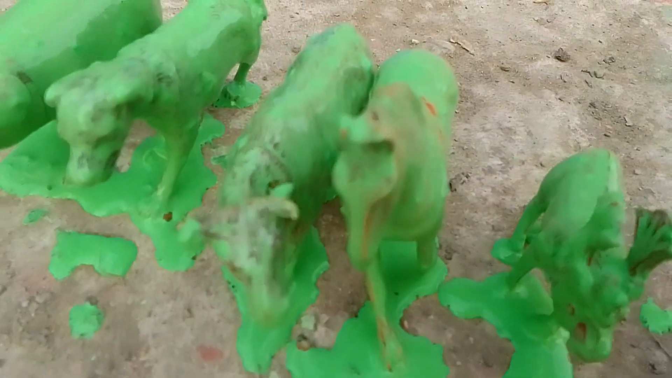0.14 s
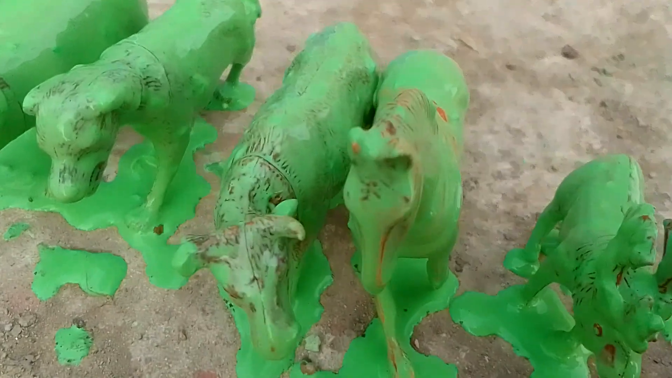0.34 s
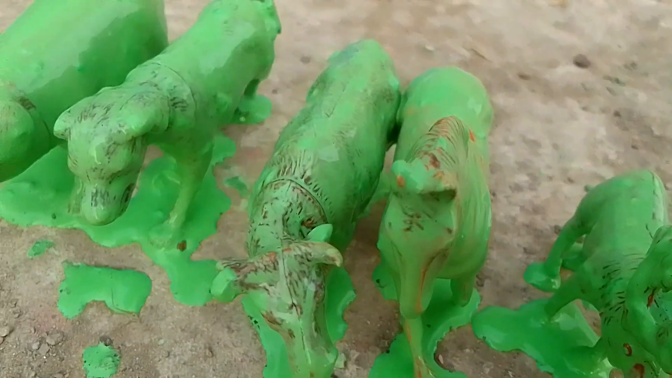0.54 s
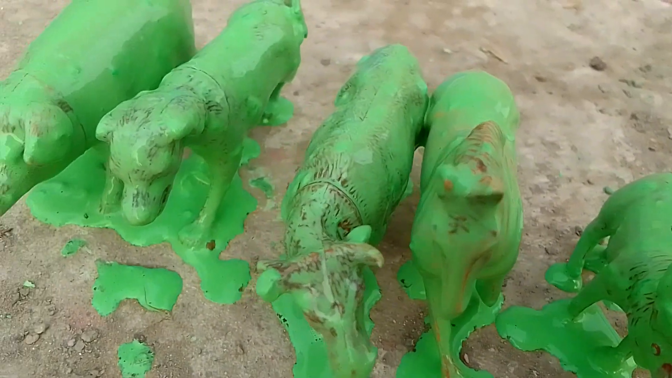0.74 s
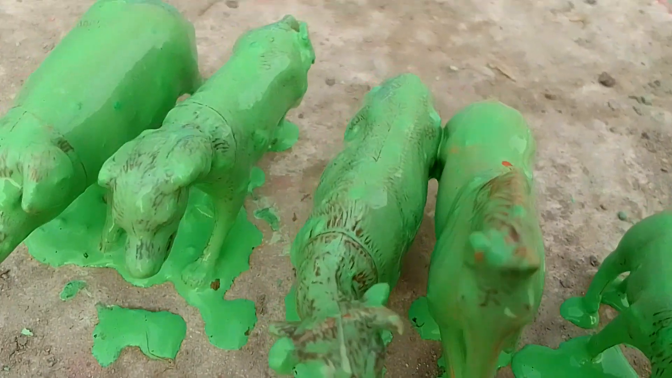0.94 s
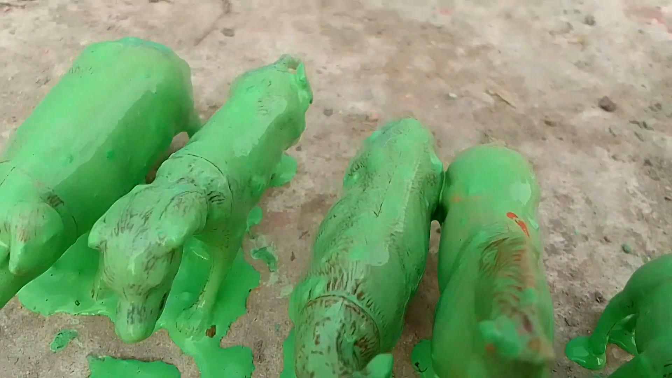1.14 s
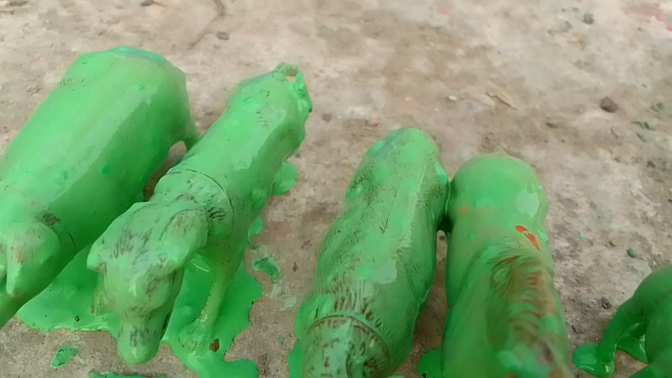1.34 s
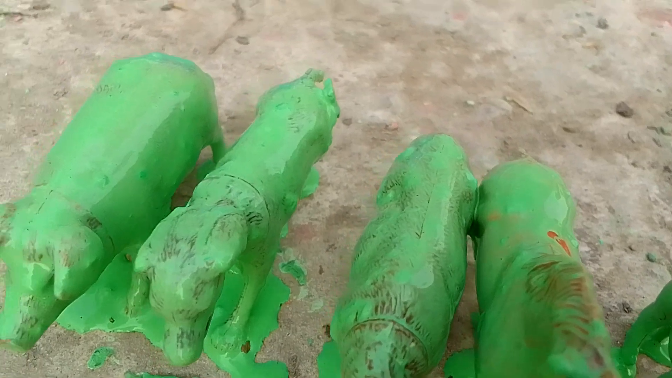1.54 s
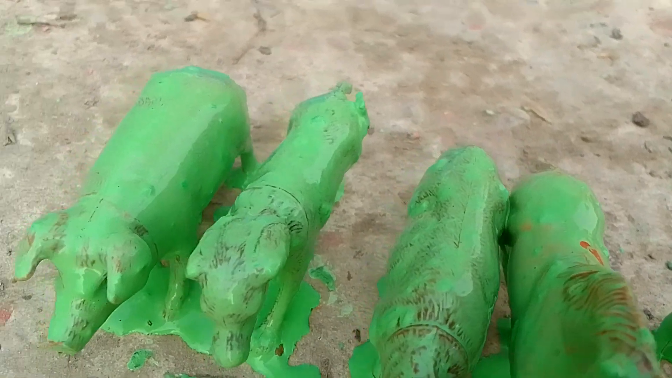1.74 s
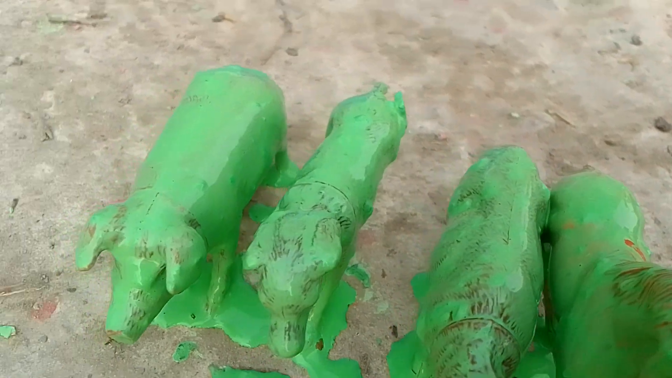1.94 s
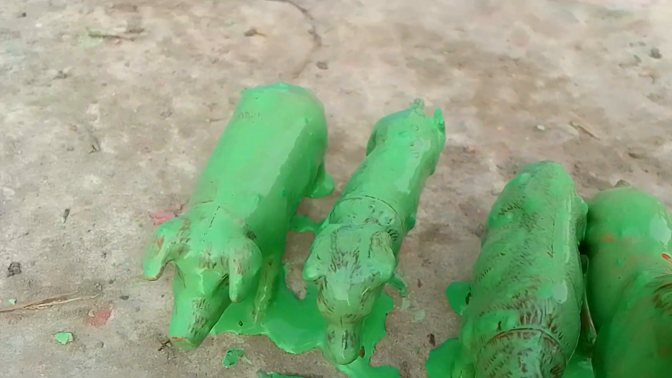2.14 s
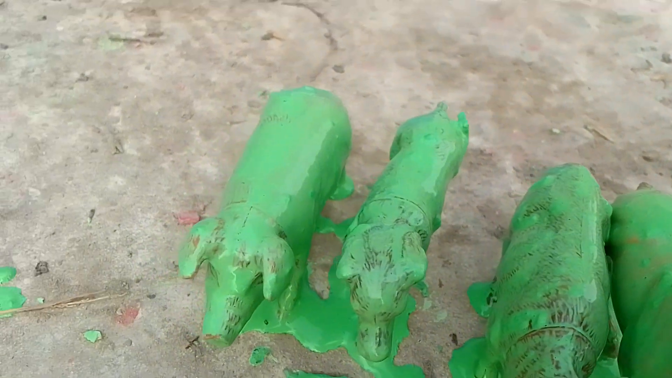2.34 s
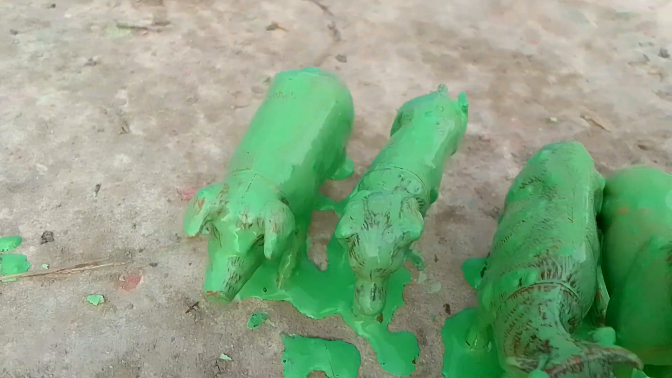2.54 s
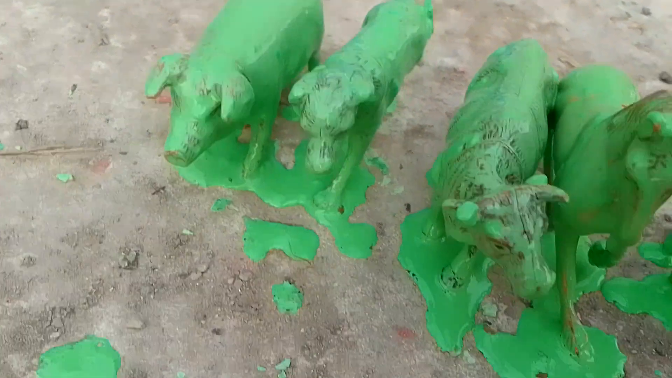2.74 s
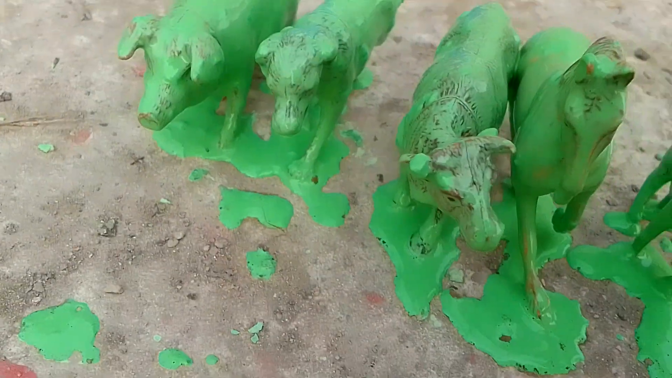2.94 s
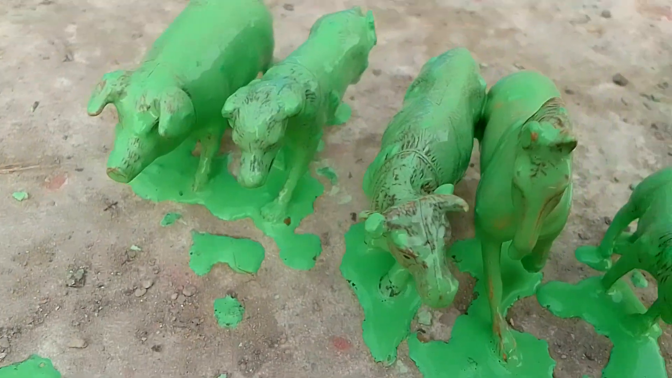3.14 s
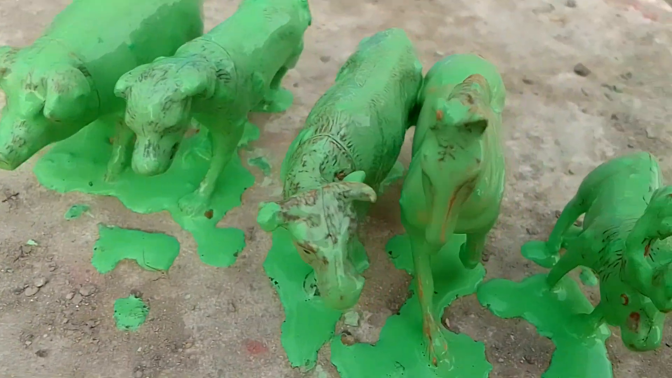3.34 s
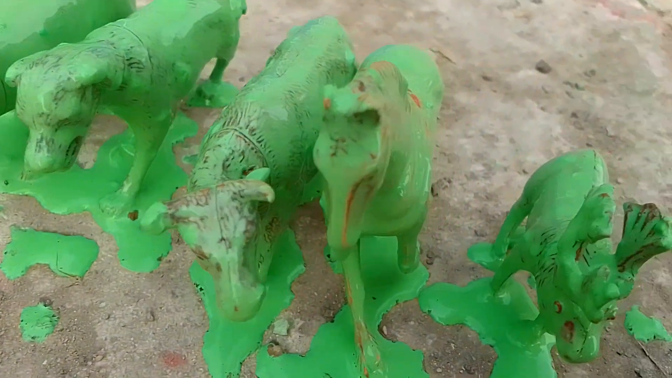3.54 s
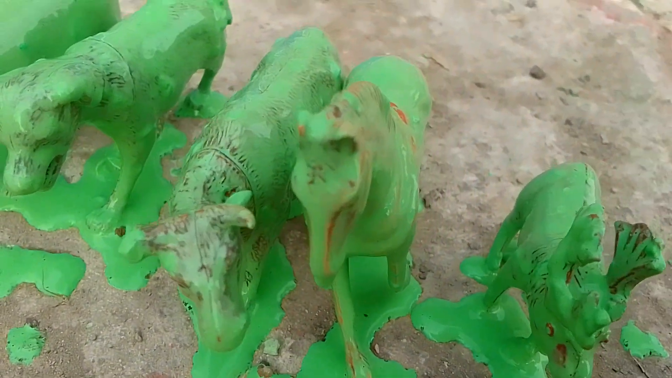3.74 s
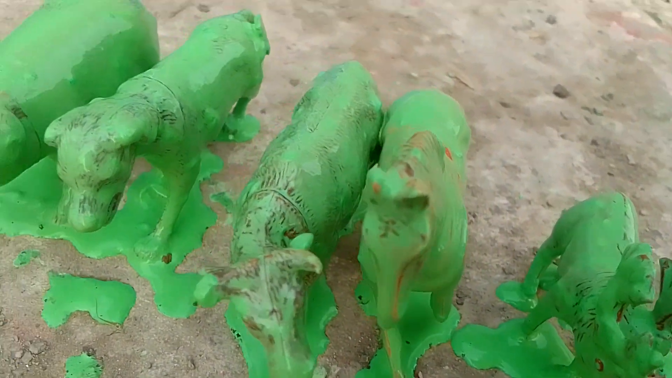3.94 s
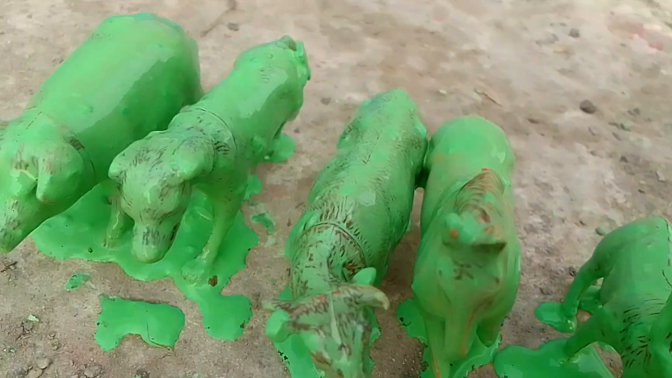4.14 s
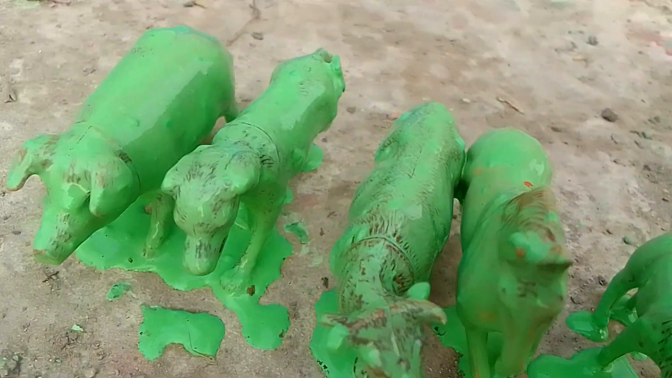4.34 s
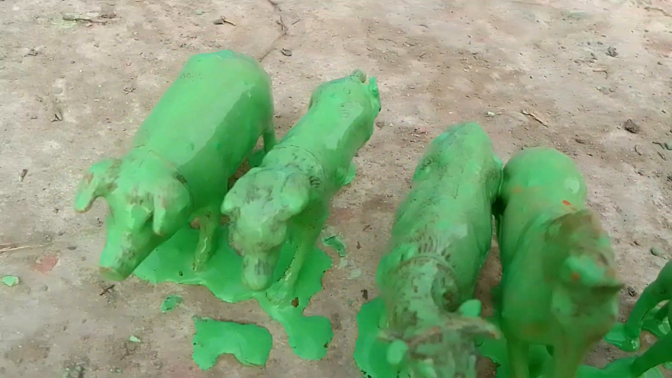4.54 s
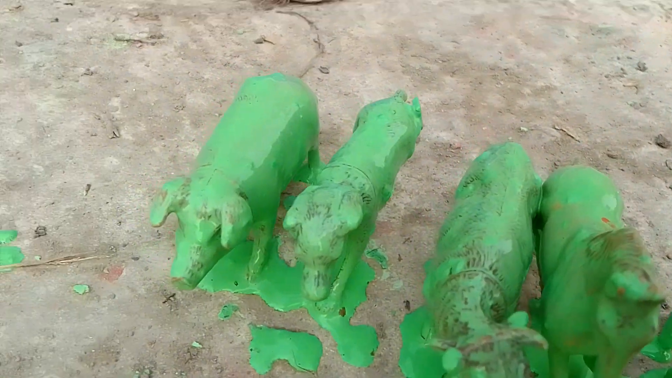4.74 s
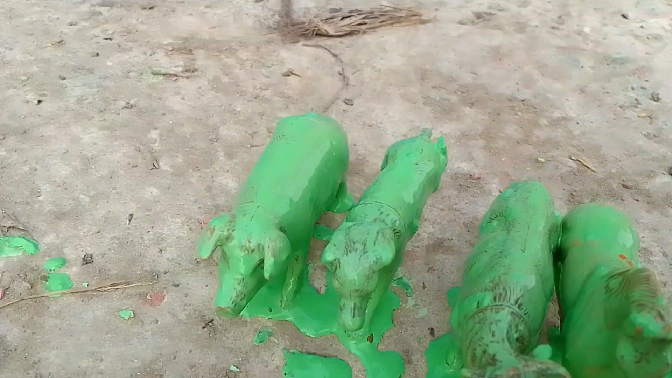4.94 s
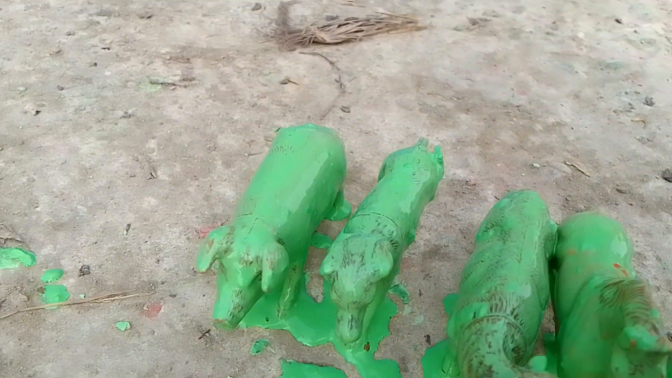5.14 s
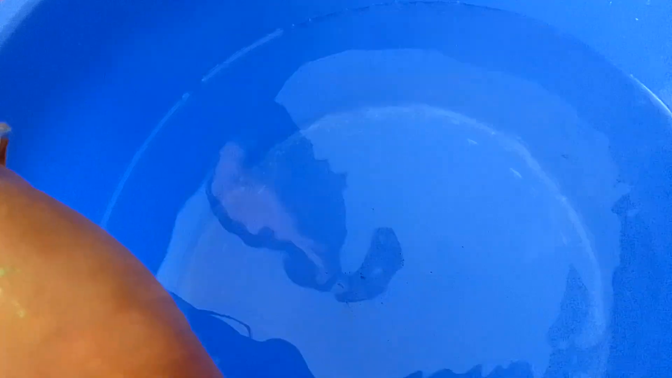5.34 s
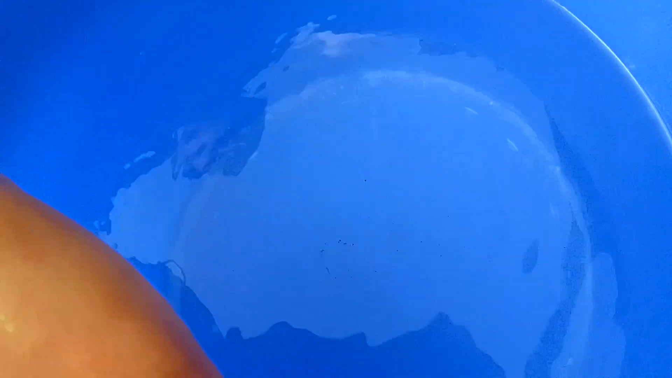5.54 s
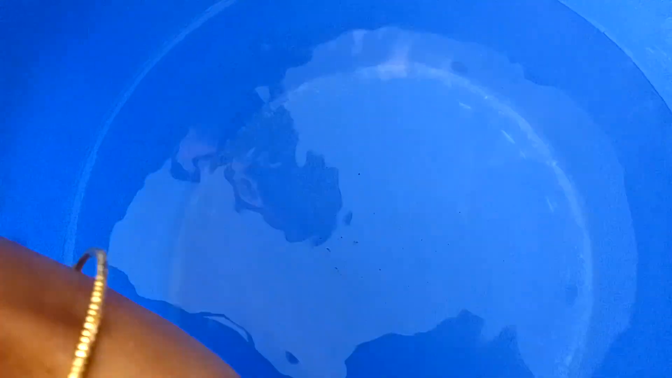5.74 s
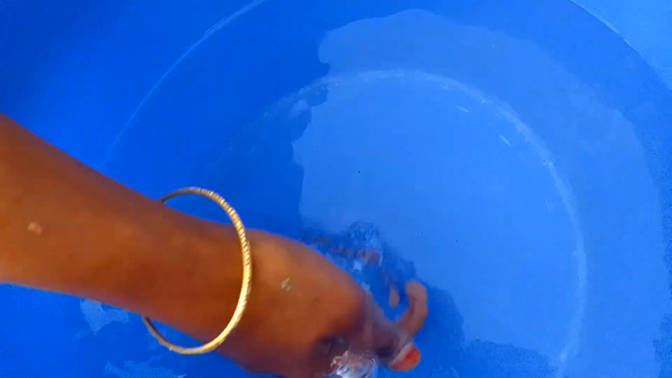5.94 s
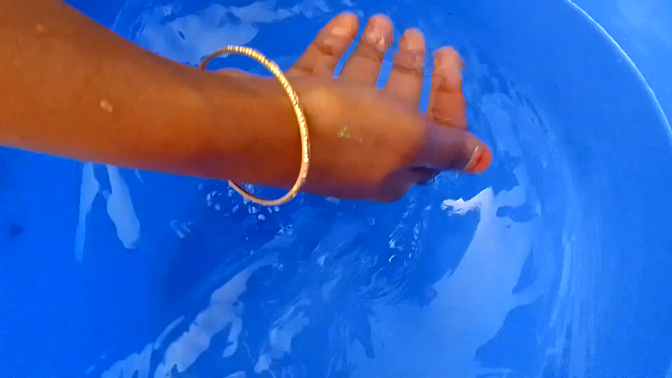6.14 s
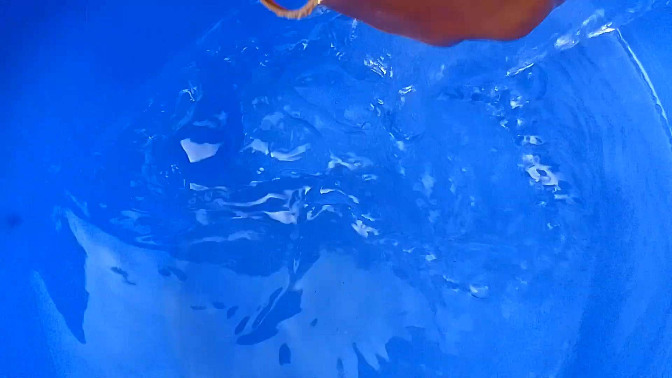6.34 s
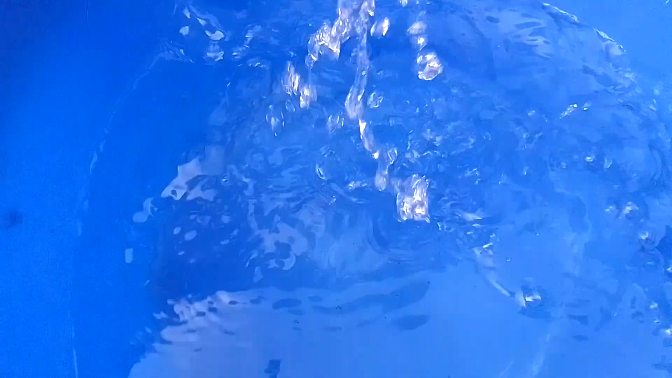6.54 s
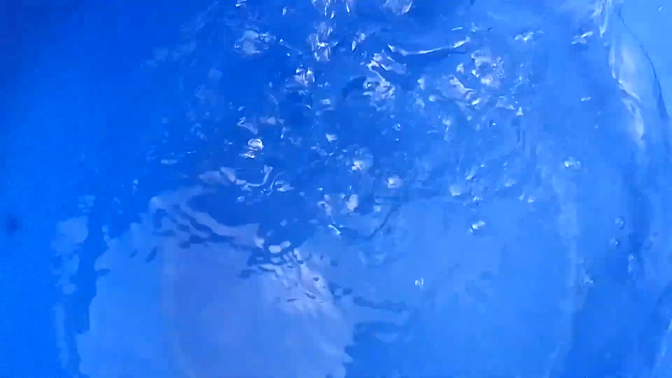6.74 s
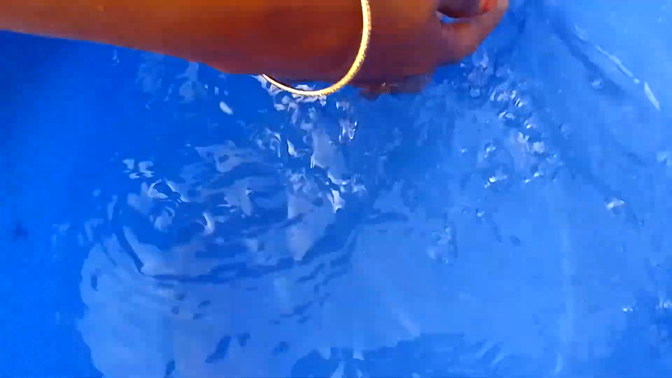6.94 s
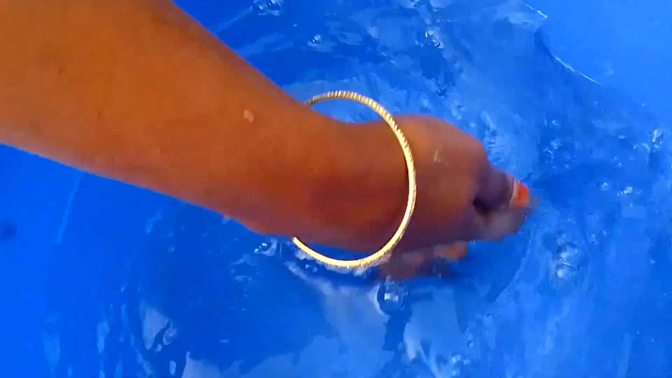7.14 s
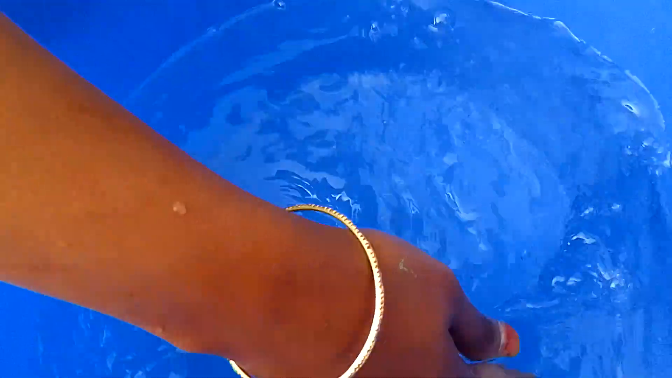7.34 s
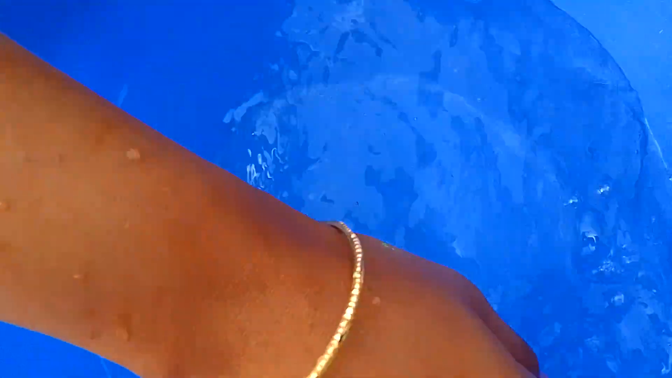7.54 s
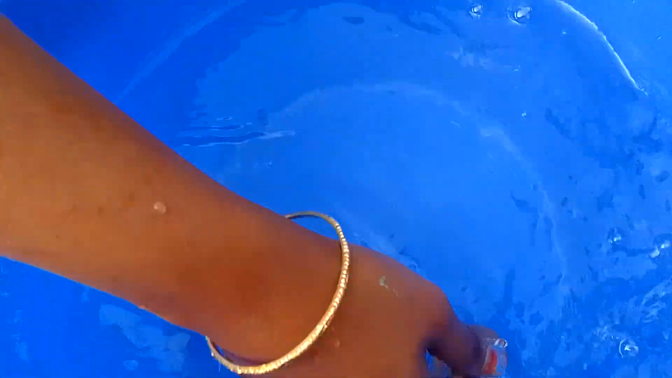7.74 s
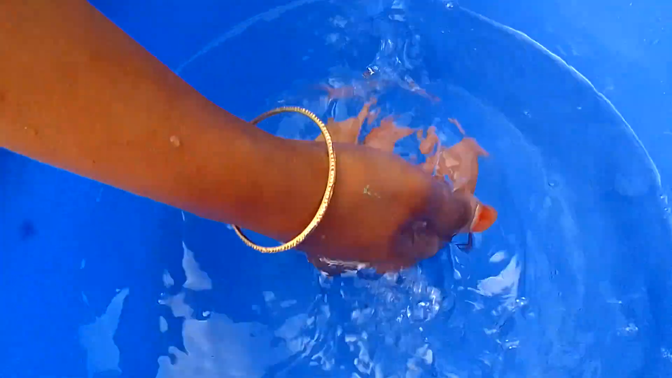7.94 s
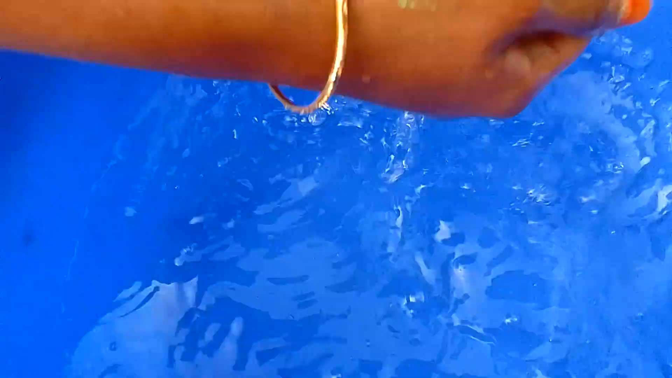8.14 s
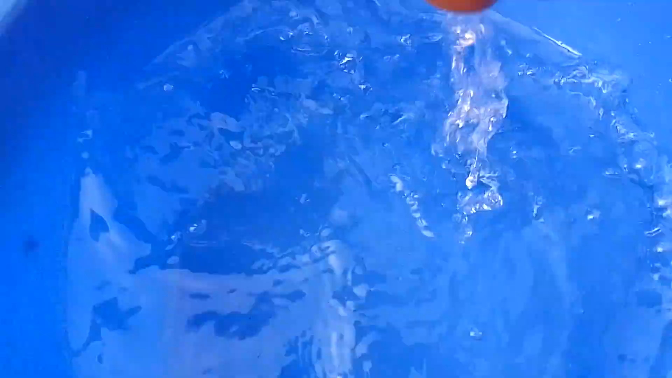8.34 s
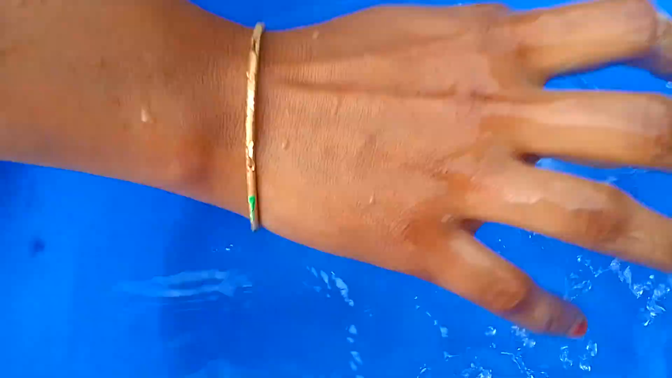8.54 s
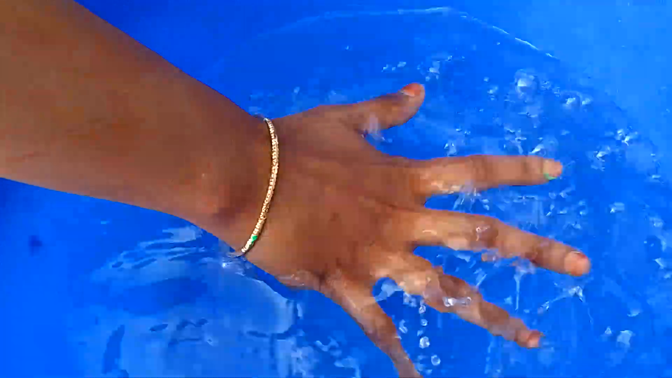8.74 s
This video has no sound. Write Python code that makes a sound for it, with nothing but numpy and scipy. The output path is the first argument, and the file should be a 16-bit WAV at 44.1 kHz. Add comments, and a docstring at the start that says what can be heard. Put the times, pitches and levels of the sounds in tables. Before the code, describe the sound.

Quiet yard with chirping birds, low wind, a few knocks, a ringing scrape and a gust; silence; then a hand splashes water in a plastic tub.

```python
"""First a yard: small birds whistle over low wind; hard knocks, a ringing scrape and a hollow bump nearby.
A gust of filtered noise moans with a thin hiss; then a silent pause.
Then a hand scoops through water in a plastic tub: gliding decaying sines ring as bubbles, noise bursts
tick and spray, and the palm slaps the surface and plunges. A faint low hum lies under the water;
birds and very low, mostly subsonic noise belong to both parts."""
import sys
import numpy as np
from scipy import signal
from scipy.fft import rfft, irfft
from scipy.io import wavfile
from scipy.ndimage import uniform_filter1d

SR = 44100
rng = np.random.default_rng(int(sys.argv[2]) if len(sys.argv) > 2 else 0)


def dump(signal):
    """Clip the signal to [-1, 1] and save it as 16-bit WAV at the path in sys.argv[1]."""
    limited = np.clip(np.atleast_2d(signal).T, -1, 1)
    pcm = np.round(limited * 32767).astype(np.int16)
    wavfile.write(sys.argv[1], SR, pcm)


N = 387198
TIME = np.arange(N) / SR
YARD_END_S, TUB_START_S = 5.086, 5.886
CUTOFF_HZ = 16300

# rel_db columns are relative: gains or normalisation follow. Spectra: rel_db per Hz.
# larger air bubbles, a few cycles if they burst at the surface:
# [start_s, pitch_hz, level_db, glide_limit_share, t60_cycles]
BUBBLES = [(5.93, 1580, -36, -0.24, 55), (6.076, 4260, -26, -0.081, 40), (6.106, 1310, -26, 0.091, 55),
           (6.1286, 1620, -24.5, 0.31, 48), (6.148, 2180, -30, 0.14, 63), (6.156, 5670, -18, .15, 39),
           (6.1847, 1820, -20.5, 0.012, 47), (6.189, 5170, -25.5, 0.16, 48), (6.23, 5600, -26.5, 0.49, 48),
           (6.2583, 1290, -22.5, -0.21, 66), (6.278, 6250, -20, -0.12, 39),
           (6.2824, 2370, -29.5, 0.091, 59), (6.2953, 830, -22.5, 0.033, 17), (6.3046, 1044, -27, 0.53, 43),
           (6.323, 1550, -4, -0.25, 2.5), (6.3615, 6100, -15.5, -0.14, 48), (6.3848, 4750, -26, 0.58, 40),
           (6.3854, 882, -30.5, -0.2, 49), (6.387, 1520, -21.5, -0.035, 18),
           (6.4353, 4300, -19.5, 0.31, 53), (6.437, 1288, -23.5, 0.39, 62), (6.444, 1423, -27, 0.36, 64),
           (6.4599, 770, -28, 0.25, 48), (6.47, 3370, -27.5, 0.55, 48), (6.489, 7130, -14.5, -0.26, 33),
           (6.504, 4340, -14, -0.13, 31), (6.505, 5570, -13, 0.17, 39), (6.5277, 3050, -28, 0.44, 42),
           (6.595, 3240, -29.5, 0.13, 43), (6.6872, 1290, -32, -0.093, 73), (6.7237, 929, -27, -0.17, 36),
           (6.73, 1790, -10.5, -0.11, 5), (6.7545, 4280, -4.5, -0.046, 8), (6.754, 1040, -10.5, -0.12, 6.5),
           (6.759, 1880, -9, -.14, 4.5), (7.3247, 1614, -35.5, -0.034, 53), (7.357, 1514, -28, 0.42, 28),
           (7.3884, 1700, -24.5, -0.15, 36), (7.649, 1730, -22.5, 0.13, 58), (7.659, 6650, -22.5, .51, 48),
           (7.679, 3170, -28, 0.044, 44), (7.768, 1150, -34.5, 0.18, 40), (7.755, 3180, -31, -0.12, 42),
           (7.7819, 990, -24, -0.12, 43), (7.784, 1620, -23, 0.28, 41), (7.812, 866, -27, -0.0023, 37),
           (7.812, 1490, -16, -0.25, 14), (7.812, 2360, -20.5, -0.032, 23), (7.833, 2000, -15, -0.06, 12),
           (7.8381, 2620, -0.5, -0.24, 4.5), (7.8868, 820, -33, -0.009, 72),
           (7.9533, 1226, -18.5, -0.007, 33), (7.982, 1870, -31.5, 0.25, 40),
           (8.02, 1288, -31.5, -0.054, 47), (8.0476, 1420, -24.5, -0.23, 33),
           (8.082, 1280, -33.5, -0.06, 59), (8.124, 3600, -22, -0.003, 15), (8.1726, 847, -37, -0.17, 55),
           (8.2249, 755, -39, -.1, 43), (8.2513, 588, -41.5, 0.25, 44), (8.253, 4040, -12, -0.094, 9),
           (8.2953, 693, -37, 0.12, 23), (8.389, 3300, -30, 0.038, 45), (8.466, 3480, -30, 0.22, 63),
           (8.49, 8300, -26, 0, 78), (8.508, 3590, -11.5, -.03, 37), (8.5096, 4600, -9.5, -0.29, 27),
           (8.523, 1730, -30, 0.11, 28), (8.5379, 4530, -10.5, -0.22, 27), (8.595, 5620, -25, -0.15, 46),
           (8.596, 1104, -41, -0.25, 120), (8.645, 4220, -20, -0.23, 19), (8.712, 2960, -11, -0.0022, 10.5),
           (8.7134, 1595, -28, -0.17, 43), (8.7138, 4740, -17.5, -0.15, 41), (8.745, 410, -39, .05, 25),
           (8.748, 1334, -32.5, 0.0092, 53), (8.762, 5200, -26.5, 0.033, 48)]
# short water ticks, some at bubble onsets: [start_s, level_rel_db, treble_rel_db]
TICKS = [(5.886, -48.5, 5), (5.935, -32.5, -11), (6.075, -30.5, -1), (6.259, -26, -1), (6.6881, -21, -6),
         (6.7336, -26, -4), (6.7524, -27.5, 4), (6.8314, -39.5, -2), (7.388, -45, -5), (7.128, -49.5, 5),
         (7.181, -49, -2), (7.75, -27, 8), (7.841, -26, -20), (7.8873, -25, -1), (7.445, -43, -6),
         (7.5176, -43, -3), (6.384, -24, 6), (6.679, -33, 9), (8.632, -32, 8), (7.9087, -38, 23),
         (7.9619, -31, -8), (8.0688, -32, 15), (8.466, -33, 12)]
# fingers and palm meeting the water: [start_s, level_rel_db, low_push_db]
SLAPS = [(8.659, -18, -39), (8.6662, -24, -24), (8.6704, -17, -9)]
# hand moves (dip, scoop, lift, pour, the handful lands, dip, scoop, pour, drip, plunge):
# [start_s, length_s, gurgle_rel_db, spray_rel_db]
STROKES = [(5.862, 0.18, -64.5, -60.5), (6.084, 0.26, -48.5, -49.5), (6.267, 0.17, -49.5, -46),
           (6.474, 0.17, -60.5, -50.5), (6.677, 0.081, -56.5, -50), (7.375, 0.31, -69.5, -72.5),
           (7.62, 0.372, -52, -50.5), (7.948, 0.41, -58.5, -54), (8.441, 0.28, -75, -56),
           (8.702, 0.13, -52.5, -53.5)]
# open hand sinking after the slap, gulping air under: [time_s, level_db]
PLUNGE = [(8.66, -110), (8.7, -63), (8.73, -49), (8.78, -47)]
# fine foam as the hand slides back in: [time_s, level_db]
FIZZ = [(7.15, -100), (7.35, -69), (7.64, -70), (7.8, -100)]
# swirl of the water mass around the hand: [time_s, level_db]
SWIRL = [(5.9, -63), (6.05, -57), (6.35, -60), (6.8, -71), (7.25, -74), (7.45, -61), (7.61, -54),
         (7.75, -59), (8.45, -66), (8.67, -53), (8.77, -53)]
# water spectra (small bubbles, spray, gulped pockets, churned foam, fizz, swirl, slap): [freq_hz, rel_db]
GURGLE_COLOUR = [(650, -11), (850, -8), (1300, -2.5), (1800, -2.5), (2400, -9.5), (3200, -31)]
SPRAY_COLOUR = [(1500, -10), (2400, -5), (3600, 1.5), (4600, 10.5), (5500, -4.5), (7800, 4.5),
                (10000, -25.5), (12500, -8), (15000, -1), (16500, -59)]
GULP_COLOUR = [(280, 16.5), (400, 18), (560, 11), (750, -2)]
WASH_COLOUR = [(300, -1.5), (550, -16), (850, -9), (1250, 0), (1750, -3.5), (2600, -22.5), (7000, -36)]
FIZZ_COLOUR = [(5000, -24), (8000, 3), (10500, -32)]
SWIRL_COLOUR = [(30, -9), (80, -4), (120, -6), (175, 0), (240, -7), (330, -12), (480, -26), (1500, -55)]
SLAP_COLOUR = [(200, 6), (1200, -5), (6000, 1.5), (10000, -12), (15000, 2)]
# tub wall resonances: [freq_hz, t60_s, rel_db]
TUB_MODES = [(829, 0.13, -4.5), (1202, 0.082, -10.5), (1570, 0.039, 1), (1804, 0.19, -10.5),
             (3540, 0.025, 6), (4090, 0.033, 3)]
STIR_RISE_S, STIR_T60_S = 0.015, 0.17
CALM_GURGLE_REL_DB, CALM_SPRAY_REL_DB = -82, -86
WASH_REL_DB = -7.5
SLAP_PULSE_S, SLAP_PULSE_REL_DB = 0.00014, 7.52  # pressure pulse of flat skin on water, re slap level

# knocks and scuffs: [start_s, level_rel_db, contact_t60_s, grit_rel_db, thud_rel_db]
KNOCKS = [(1.7675, -35, .016, -20, -8), (1.783, -51.5, .015, -21, 2), (1.803, -44, 0.048, -21.5, -15),
          (2.11, -52.5, 0.072, -20, -8.5), (2.239, -57, 0.075, -2.5, -17), (2.818, -53.5, 0.034, 13, -1.5)]
# resonances of the knocked thing: [freq_hz, width_hz, rel_db]
KNOCK_MODES = [(480, 140, -13), (1090, 92, -0.5), (1520, 150, -3.5), (1900, 190, 0), (2750, 55, -8),
               (3020, 55, -12.5), (3400, 41, -15.5), (4400, 140, -12.5)]
# gritty scrape in two pushes: [time_s, level_rel_db]
SCRAPE = [(2.6, -89), (2.81, -66.5), (2.821, -49), (2.88, -56), (3, -66.5), (3.014, -55.5), (3.085, -54.5),
          (3.115, -66), (3.22, -100.5)]
# resonances of the scraped thing: [freq_hz, width_hz, rel_db]
SCRAPE_MODES = [(1333, 12, 3), (1676, 55, -2.5), (2600, 15, 0.5), (3880, 60, 0.5), (4900, 45, -2),
                (6380, 35, -1), (7650, 190, 3.5)]
# spectra of grit and of the low thud: [freq_hz, rel_db]
GRIT_COLOUR = [(250, -19), (400, 4.5), (800, -17), (1500, -5), (3130, -10), (6000, -6.5), (8200, 0),
               (10500, -14), (16000, -8.5)]
THUD_COLOUR = [(50, 8.5), (110, -4), (175, 16.5), (280, -10.5), (700, -43)]
# soft hollow bump: [start_s, pitch_hz, level_db, t60_s]
BUMPS = [(3.415, 192.3, -26, 0.091)]

# bird notes: [length_s, start_pitch_share, end_pitch_share, second_voice_rel_db]; shares of middle pitch
ARCH = (0.0837, 0.82, 0.89, -7.5)
RISE = (0.06, 0.9, 1.14, -20.5)
FALL = (.04, 1.26, 0.92, -20)
FLICK = (0.01, 1.1, 0.8, -20)
PEEP = (0.08, 0.94, 1.01, -31)
# near chirps: [start_s, middle_pitch_hz, level_rel_db, note]
CHIRPS = [(.15, 5700, -71, ARCH), (.168, 2490, -65, FLICK), (.232, 4740, -66, RISE),
          (.422, 3890, -60, ARCH), (1.09, 5700, -70, PEEP), (1.174, 4900, -71, ARCH),
          (1.63, 3190, -64, RISE), (1.663, 4230, -56, ARCH), (2.06, 4160, -59, ARCH),
          (2.29, 5950, -59.5, PEEP), (3.2, 4680, -65, ARCH), (3.255, 3900, -64, FALL),
          (3.316, 4270, -55, ARCH), (3.365, 3700, -57.5, FALL), (3.39, 2300, -58, FALL),
          (3.548, 5970, -63, PEEP), (3.583, 2600, -65.5, FALL), (3.785, 3670, -69, RISE),
          (3.828, 3100, -63.5, FALL), (3.872, 4040, -59.5, ARCH), (3.998, 4200, -57, ARCH),
          (4.034, 2850, -53, FLICK), (4.059, 3000, -53.5, FLICK), (4.075, 2690, -52.5, FALL),
          (4.138, 5290, -58, PEEP), (4.213, 2770, -54.5, FLICK), (4.21, 6390, -57, PEEP),
          (4.285, 5400, -56, PEEP), (4.37, 5400, -58.5, PEEP), (4.555, 5560, -62, PEEP),
          (4.592, 4460, -59.5, PEEP), (4.628, 4920, -63, RISE), (4.685, 3900, -60, PEEP),
          (5.046, 4500, -64.5, FALL), (7.485, 5400, -65, FALL), (7.553, 4150, -63, ARCH)]
# spells of fainter flock twitter: [start_s, end_s, level_rel_db]
TWITTER = [(.03, .42, -73.5), (3.18, 3.6, -70), (3.8, 4.7, -67.5)]
SECOND_VOICE_RATIO = 1.14

# gust: [time_s, level_rel_db]
GUST = [(3.8, -68), (4.08, -58), (4.4, -48), (4.6, -56.5), (4.75, -58.5), (5.05, -60.5)]
# low wind: [time_s, level_db]
WIND = [(0, -65.5), (1.4, -67), (2, -65), (2.6, -63), (2.87, -55.5), (3.2, -62), (3.8, -64), (4.4, -62),
        (5.08, -64)]
# background spectra (gust moan and hiss, wind, steady air, hum under the tub, subsonic): [freq_hz, rel_db]
GUST_MOAN_COLOUR = [(90, -30), (160, -1), (225, -1), (300, -12), (600, -57), (2000, -110)]
GUST_HISS_COLOUR = [(1200, -2.5), (1750, 6), (3800, -20), (5500, -4.5), (11000, -32)]
WIND_COLOUR = [(25, -6), (60, 8), (110, 6.5), (165, 2), (220, -12.5), (300, -25.5), (450, -25),
               (1500, -70.5)]
AIR_COLOUR = [(180, -44.5), (300, -13.5), (398, -7.5), (593, -2), (737, -11.5), (1060, -6.5), (2650, -21),
              (7080, -26.5), (16000, -42.5)]
HUM_COLOUR = [(30, 4), (100, -1), (180, 1), (420, -11), (850, -24), (1810, -15), (2440, -31), (5000, -30),
              (7730, -23), (10200, -40), (14500, -34)]
SUBSONIC_COLOUR = [(2, 12), (35, 0), (80, -22), (600, -130)]
AIR_DB, HUM_DB, SUBSONIC_DB = -74.5, -69.5, -65.5
DRONE_HZ, DRONE_DB = 161.5, -73


def splashes():
    """All water sounds: stirred gurgle and spray under single bubbles, ticks and slaps."""
    return gurgle() + spray() + large_bubbles() + ticks() + slaps()


def gurgle():
    """Stirring traps small bubbles and churns foam; the plunge gulps larger pockets."""
    bubbles = amp(-0.5) * swarm(GURGLE_COLOUR, cycles=28.0, spread_db=6, glide=0.25, count=1300)
    wash = amp(WASH_REL_DB) * noise(WASH_COLOUR) * drift(depth_db=1.5, size=350)
    gulps = swarm(GULP_COLOUR, cycles=26, spread_db=3, glide=0.25, count=250)
    return churn(axis=2, calm_db=CALM_GURGLE_REL_DB) * (bubbles + wash) + level(PLUNGE) * gulps


def spray():
    """Tiny bubbles and bursting droplets follow the hand; dense droplets make the fizz."""
    mist = amp(1.5) * swarm(SPRAY_COLOUR, cycles=41, spread_db=7.5, glide=0.43, count=3000)
    mist += amp(-5) * patter(SPRAY_COLOUR, spread_db=5.5, count=3200)
    fizz = level(FIZZ) * patter(FIZZ_COLOUR, spread_db=6.0, count=20000)
    return churn(axis=3, calm_db=CALM_SPRAY_REL_DB) * mist + fizz


def large_bubbles():
    """Each larger cavity seals with a rush, then rings."""
    out = np.zeros(N)
    for start_s, pitch_hz, level_db, glide, cycles in BUBBLES:
        lead_s, sound = pocket(pitch_hz, cycles, glide)
        add(out, start_s - lead_s, amp(level_db) * sound)
    return out


def ticks():
    """A tick is a short noise burst, reflected by the tub wall."""
    out = np.zeros(N)
    t = np.arange(2048) / SR
    burst = noise_burst(t, rise=0.00014, t60=0.0099)
    for start_s, level_db, treble_db in TICKS:
        colour = [(500, -1), (3500, 14.0), (7500, 19.5), (10000, treble_db + 0.5), (15000, treble_db - 4.5)]
        tick = amp(level_db - 3.5) * noise(colour, size=len(t)) * burst
        add(out, start_s, rebound(tick, strength=0.14))
    return out


def slaps():
    """Skin on water: a noise burst, a pressure pulse and air squeezed out under the palm."""
    out = np.zeros(N)
    t = np.arange(2048) / SR
    burst = noise_burst(t, rise=0.00018, t60=0.0075)
    pulse = (t / SLAP_PULSE_S - 1) * np.exp(-t / SLAP_PULSE_S)
    for start_s, level_db, push_db in SLAPS:
        add(out, start_s, amp(level_db) * noise(SLAP_COLOUR, size=len(t)) * burst)
        add(out, start_s, amp(level_db + SLAP_PULSE_REL_DB) * pulse)
        add(out, start_s, amp(push_db) * bubble(1670, 0.0049, -0.59))
    return out


def bubble(hz, t60, glide, onset_cycles=2.43):
    """An air pocket rings; pitch climbs as it nears the surface, sags as it is pushed under."""
    t = np.arange(int(t60 * SR) + 2) / SR
    pitch_hz = hz * (1 + glide * (1 - fade(t, 3 * t60)))
    onset = 1 - np.exp(-t * hz / onset_cycles)
    return onset * fade(t, t60) * np.sin(2 * np.pi * np.cumsum(pitch_hz) / SR)


def closing(hz, t60):
    """The rough rush of water as a cavity narrows and seals, in a band around the bubble's pitch."""
    rush = noise([(hz / 2, -24), (hz, 0), (hz * 2, -24)], size=1100)
    return np.sqrt(t60) * rush * np.hanning(len(rush)) ** 2


def pocket(hz, cycles, glide):
    """A cavity seals with a rush, then rings; returns the rush's lead in s, and the sound."""
    t60 = cycles / hz
    rush = closing(hz, t60)
    out = np.zeros(int(t60 * SR) + 1200)
    lead_s = len(rush) / SR / 2
    add(out, 0, amp(-9) * rush)
    add(out, lead_s, bubble(hz, t60, glide))
    return lead_s, out


def swarm(colour, cycles, spread_db, glide, count):
    """Many small bubbles of random pitch and size that swell as they pinch off; running rms 1."""
    out = np.zeros(N)
    low_hz, high_hz = colour[0][0], colour[-1][0]
    for when, pitch, size, ring, rise in rng.random((count, 5)):
        hz = low_hz + pitch * (high_hz - low_hz)
        t60 = min(cycles * 2 ** (2 * ring - 1) / hz, 0.1)
        strength = amp(spread_db * min(-np.log(size), 3)) * gain_at(colour, hz) / np.sqrt(t60)
        ping = bubble(hz, t60, glide * (rise - 0.3), onset_cycles=hz * t60 / 8)
        start_s = TUB_START_S + when * (N / SR - TUB_START_S)
        add(out, start_s, strength * rebound(ping, strength=0.14))
    return out / np.sqrt(abs(uniform_filter1d(out ** 2, size=3000)) + 1e-9)


def patter(colour, spread_db, count):
    """Tiny droplets burst on the surface, each a very short fizz; level evened to about 1."""
    hits = np.zeros(N)
    hits[rng.integers(0, N, count)] = amp(spread_db * np.minimum(rng.exponential(1, count), 3)) ** 2
    power = np.convolve(hits, np.hanning(60), "same")
    return noise(colour) * np.sqrt(power / (abs(uniform_filter1d(power, size=3000)) + 1e-9))


def churn(axis, calm_db):
    """Gain from one dB column of the hand's moves: quick rise, hold, settling; powers add."""
    power = amp(calm_db) ** 2
    for move in STROKES:
        t, length_s = TIME - move[0], move[1]
        outline = np.clip(t / STIR_RISE_S, 0, 1) * fade(np.maximum(t - length_s, 0), STIR_T60_S)
        power = power + (amp(move[axis]) * outline) ** 2
    return np.sqrt(power)


def rebound(x, strength, count=5):
    """First few reflections from the tub wall, a random pattern within 6 ms."""
    taps = np.zeros(260)
    taps[rng.integers(25, len(taps), count)] = strength * rng.choice([-1, 1], count)
    taps[0] = 1
    return np.convolve(x, taps / np.linalg.norm(taps))


def tub(water):
    """The plastic walls ring with the splashes and the surroundings return them faintly."""
    t = np.arange(6000) / SR
    walls = sum(amp(db) * fade(t, t60) * np.sin(2 * np.pi * hz * t) for hz, t60, db in TUB_MODES)
    ring = signal.oaconvolve(water, walls / np.linalg.norm(walls))[:N]
    out = water + amp(-21.5) * ring
    return out + amp(-3.5) * echoes(water, 0.011, 2800) + amp(-14.5) * echoes(water, 0.23, 3200)


def swirl():
    """The water mass moves around the hand: low noise."""
    return level(SWIRL) * noise(SWIRL_COLOUR)


def knocks():
    """Struck and scraped resonances with grit, thuds and a hollow bump, plus their reflections."""
    rub = level(SCRAPE) * drift(depth_db=2, size=200)
    out = amp(-2) * rub * noise(GRIT_COLOUR)
    out += amp(-5) * ringing(SCRAPE_MODES, rub * rng.standard_normal(N))
    t = np.arange(12000) / SR
    for start_s, level_db, contact_t60_s, grit_db, thud_db in KNOCKS:
        contact = noise_burst(t, rise=0.0004, t60=contact_t60_s)
        force = 0.48 * contact * rng.standard_normal(len(t))
        force[0] += 7  # the blow itself, ahead of the chatter
        grit = amp(grit_db) * noise(GRIT_COLOUR, size=len(t)) * contact
        thud = amp(thud_db) * noise(THUD_COLOUR, size=len(t)) * noise_burst(t, rise=0.0021, t60=0.093)
        add(out, start_s, amp(level_db) * (ringing(KNOCK_MODES, force) + grit + thud))
    for start_s, pitch_hz, level_db, t60_s in BUMPS:
        add(out, start_s, amp(level_db) * bubble(pitch_hz, t60_s, 0))  # a hollow rings like an air pocket
    return out + amp(-6.5) * echoes(out, 0.61, 5100)


def ringing(modes, drive):
    """Resonances ring with the driving force and go on after it, within the drive's length."""
    t = TIME[:SR // 2]
    ring = np.zeros(len(t))
    for hz, width_hz, db in modes:
        ring += amp(db) * evened(np.exp(-np.pi * abs(width_hz) * t) * np.sin(2 * np.pi * hz * t))
    return signal.oaconvolve(drive, ring / np.linalg.norm(ring))[:len(drive)]


def birds():
    """Near chirps, and random flock twitter heard only by way of reflections."""
    near, far = np.zeros(N), np.zeros(N)
    for start_s, pitch_hz, level_db, note in CHIRPS:
        add(near, start_s, amp(level_db) * chirp(pitch_hz, *note))
    for start_s, end_s, level_db in TWITTER:
        length_s = end_s - start_s
        for when, pitch, kind in rng.random((int(24 * length_s), 3)):  # 24 notes per s
            note = RISE if kind < 0.5 else FALL
            add(far, start_s + when * length_s, amp(level_db) * chirp(3000 + 2800 * pitch, *note))
    out = amp(-1) * near + amp(-8) * echoes(near + far, 0.05, 9000)
    return out + amp(-3) * echoes(near + far, 0.55, 6500)


def chirp(middle_hz, length_s, first, last, second_db):
    """A curved whistle, a little ragged in pitch and level, with a weaker second voice above it."""
    u = np.linspace(0, 1, int(length_s * SR))
    wobble, flutter = (evened(uniform_filter1d(v, size=60)) for v in rng.standard_normal((2, len(u))))
    curve = np.polyval(np.polyfit([0, 0.5, 1], [first, 1, last], 2), u)
    phase = 2 * np.pi * np.cumsum(middle_hz * curve * (1 + 0.012 * wobble)) / SR
    voices = np.sin(phase) + amp(second_db) * np.sin(SECOND_VOICE_RATIO * phase)
    return np.sqrt(abs(np.sin(np.pi * u))) * (1 + 0.3 * flutter) * voices


def wind():
    """Low wind noise, and a gust that moans with a thin hiss on top."""
    gust = level(GUST) * (amp(-2.5) * noise(GUST_MOAN_COLOUR) + amp(-17.0) * noise(GUST_HISS_COLOUR))
    return gust + level(WIND) * noise(WIND_COLOUR)


def air():
    """Steady background noise, slightly wavering."""
    return amp(AIR_DB) * noise(AIR_COLOUR) * drift(depth_db=0.4, size=3000)


def hum():
    """Shaped noise with one wavering tone in it."""
    drone = amp(DRONE_DB) * drift(depth_db=8.0, size=6000) * np.sin(2 * np.pi * DRONE_HZ * TIME)
    return amp(HUM_DB) * noise(HUM_COLOUR) + drone


def subsonic():
    """Very low, mostly subsonic noise."""
    return amp(SUBSONIC_DB) * noise(SUBSONIC_COLOUR)


def echoes(x, t60, top_hz, size=30000):
    """Diffuse reflections that die away, dull above top_hz."""
    t = np.arange(size) / SR
    taps = rng.standard_normal(size) * (rng.random(size) < 0.1) * fade(t, t60) * (t > 0.003)
    lowpass = signal.butter(1, min(top_hz, 0.45 * SR), fs=SR)
    tail = signal.lfilter(*lowpass, taps / np.linalg.norm(taps))
    return signal.oaconvolve(x, tail)[:N]


def noise(colour, size=N):
    """Noise of rms 1 with the given spectrum."""
    spectrum = rfft(rng.standard_normal(size)) * gain_at(colour, np.fft.rfftfreq(size, 1 / SR))
    return evened(irfft(spectrum, size))


def noise_burst(t, rise, t60):
    """Outline of a short burst, peak 1."""
    outline = (1 - np.exp(-t / rise)) * fade(t, t60)
    return outline / outline.max()


def drift(depth_db, size):
    """Random smooth gain, depth_db rms."""
    wander = uniform_filter1d(uniform_filter1d(rng.standard_normal(N), size=size), size=size)
    return amp(depth_db * evened(wander))


def fade(t, t60):
    """Exponential decay, 60 dB in t60."""
    return np.exp(-np.log(1000) * t / t60)


def gain_at(colour, hz):
    """Reads a spectrum on a log-frequency axis."""
    freq_hz, db = np.transpose(colour)
    return amp(np.interp(np.log(hz + 1), np.log(freq_hz), db))


def level(rows):
    """Gain over time from a dB curve."""
    return amp(np.interp(TIME, *np.transpose(rows)))


def amp(db):
    """Decibels to gain."""
    return 10 ** (np.asarray(db) / 20)


def evened(x):
    """Scales to rms 1."""
    return x / np.sqrt(np.mean(x ** 2) + 1e-20)


def add(mix, start_s, sound):
    """Mixes a sound in at start_s."""
    part = mix[max(round(start_s * SR), 0):][:len(sound)]
    part += sound[:len(part)]


def scene():
    """The yard, a silent pause, then the tub; birds and subsonic noise in both."""
    in_yard, at_tub = TIME < YARD_END_S, TIME > TUB_START_S
    yard = knocks() + wind() + air()
    water = tub(splashes()) + swirl() + hum()
    both = birds() + subsonic()
    return (yard * in_yard + water * at_tub + both * (in_yard | at_tub))[None]


def record(dry):
    """Linear-phase low-pass at CUTOFF_HZ."""
    lowpass = signal.firwin(255, CUTOFF_HZ, window=("kaiser", 9), fs=SR)
    return signal.oaconvolve(dry, lowpass[None], "same")


dry = scene()
out = record(dry)
dump(out)
```